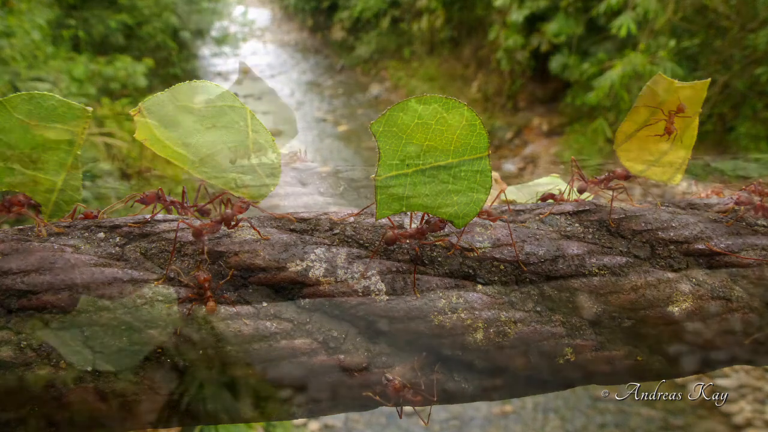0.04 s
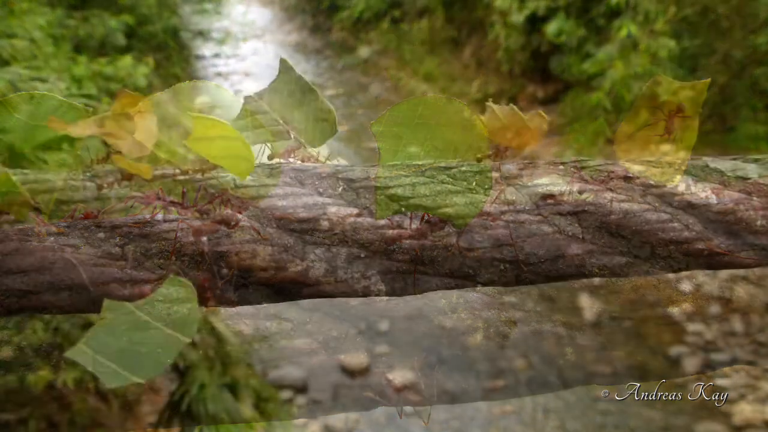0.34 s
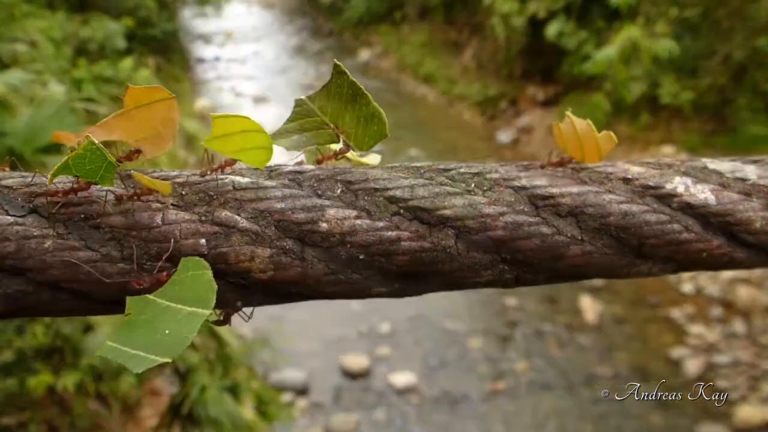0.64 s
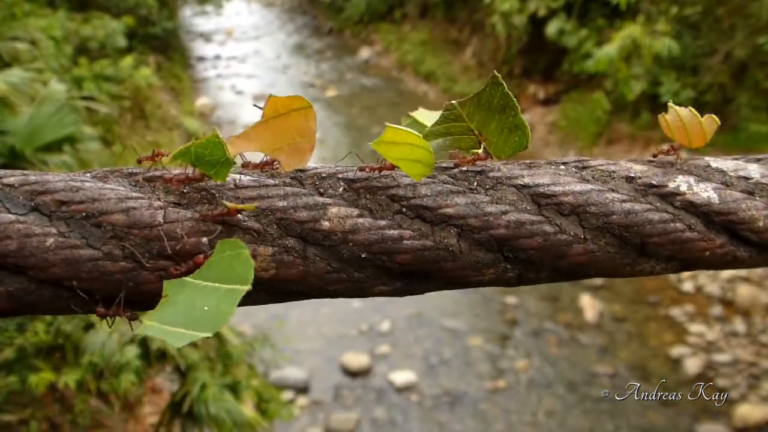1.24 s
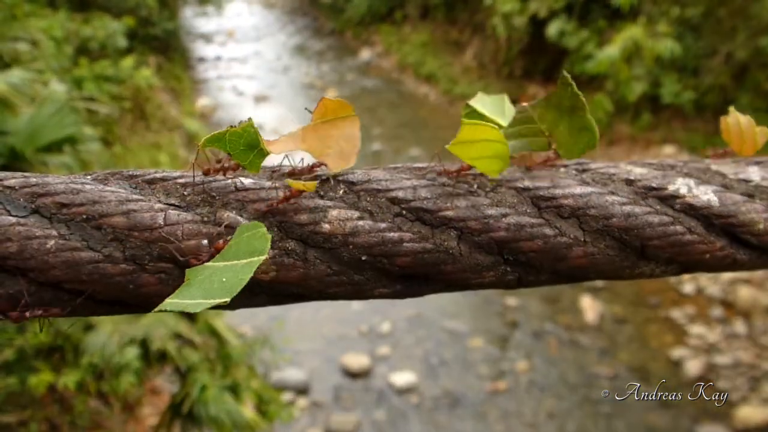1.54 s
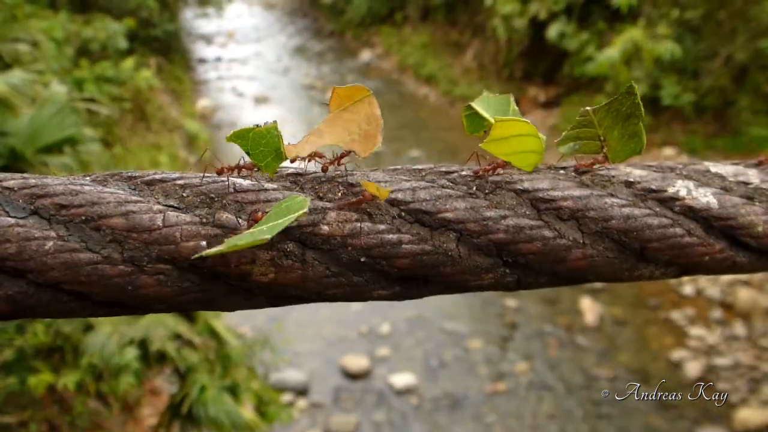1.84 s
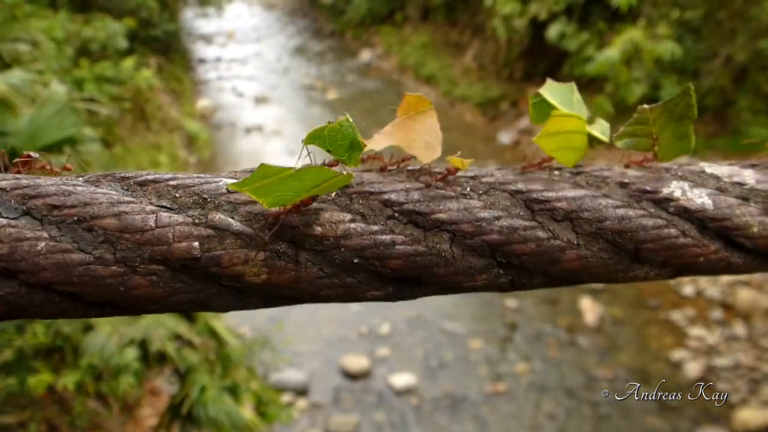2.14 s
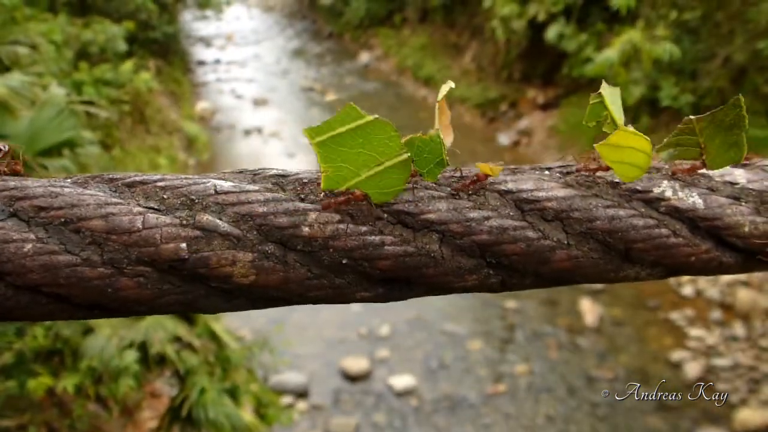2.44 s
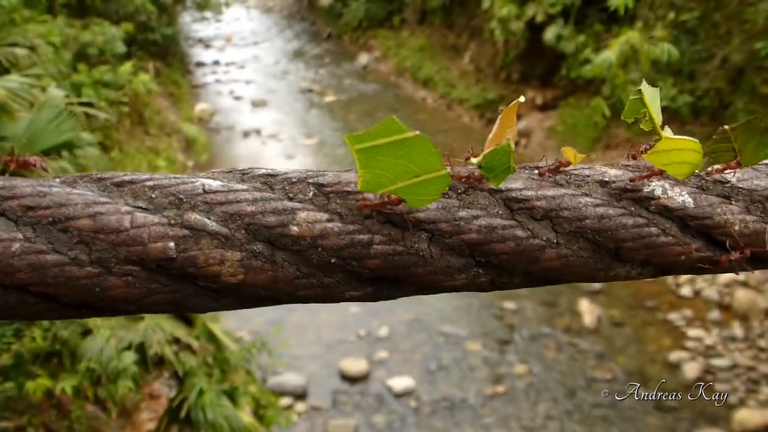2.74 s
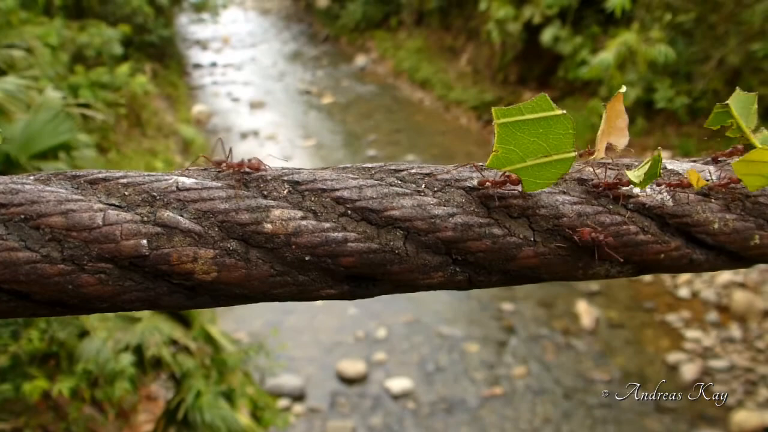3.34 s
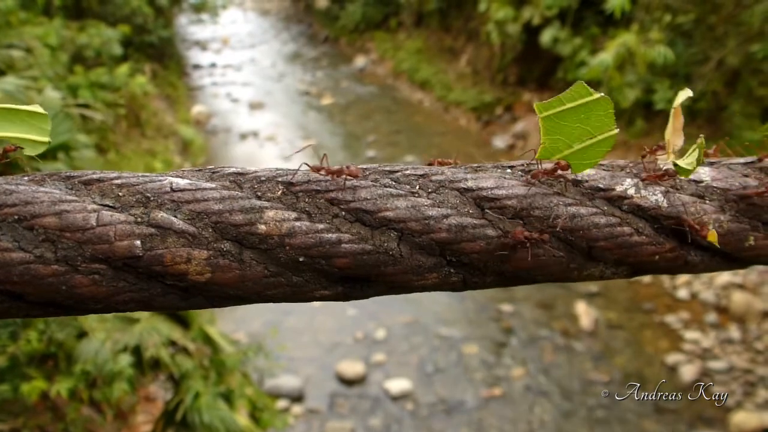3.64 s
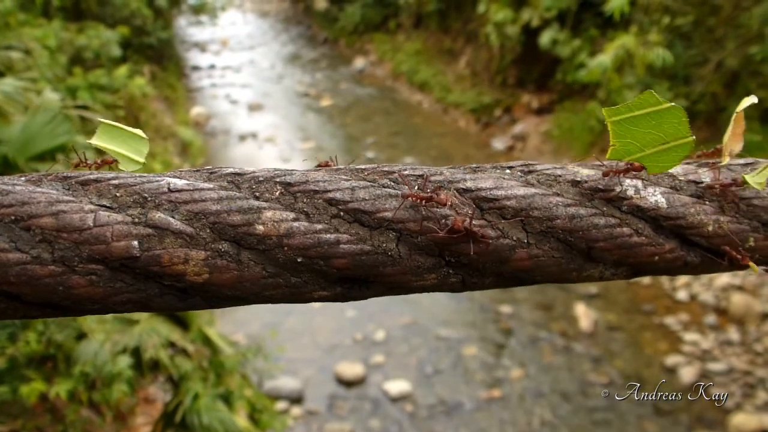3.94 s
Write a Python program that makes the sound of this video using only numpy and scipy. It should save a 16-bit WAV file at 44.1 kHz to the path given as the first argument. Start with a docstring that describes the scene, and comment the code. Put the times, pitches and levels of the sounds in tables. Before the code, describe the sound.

Steady rush of a stream churning over rocks, with small gulps and a faint bird.

```python
"""A forest stream rushes over rocks, in mono.
White water makes a broad, churning rush; countless bubbles ring in it and a few big air pockets gulp.
A small bird chips faintly over the water. Banks and trees scatter the bubbles, gulps and chips.
The sound cuts in after a quarter second and fades up."""
import sys
import numpy as np
from scipy import signal
from scipy.fft import rfft, irfft
from scipy.io import wavfile
from scipy.ndimage import uniform_filter1d

SR = 44100
rng = np.random.default_rng(int(sys.argv[2]) if len(sys.argv) > 2 else 0)


def master_out(mix):
    """Clip the mix to full scale and print it as 16-bit PCM to the path in sys.argv[1]."""
    frames = np.transpose(np.atleast_2d(mix))
    ceiling = np.clip(frames, -1, 1)
    pcm = np.round(ceiling * 32767).astype(np.int16)
    wavfile.write(sys.argv[1], SR, pcm)


N = 176400

# white-water spectral density: f/Hz, relative level/dB
RUSH_SPECTRUM = [(25, -31), (42, -30), (57, -16.5), (78, -21.5), (115, -11), (188, -7), (255, -1.5),
                 (310, -1), (380, 0), (510, 1), (826, -1.5), (1000, -3.5), (1380, -4), (1800, -7.5),
                 (2300, -9), (4150, -15), (5580, -17), (6600, -18.5), (7800, -21.5), (10000, -24),
                 (14300, -31), (15600, -36)]
# slow swell of the rush's midrange: t/s, gain/dB
MID_SWELL = [(.26, -0.1), (.38, 0.5), (.6, 0), (.82, 0.8), (1.0, 0.2), (1.18, -1), (1.5, 0), (1.85, -.9),
             (2.05, 0.1), (2.35, 0.3), (2.6, -1.4), (2.98, 1), (3.42, -0.5), (3.58, 0.5), (3.7, 0.2),
             (4.0, 0.5)]
# bubble-swarm filter: f/Hz, relative gain/dB
BUBBLE_EQ = [(150, -34), (330, -1), (600, -2.5), (1300, 2), (2300, -5.5), (5000, -12.5), (12000, -23)]
# air pockets: t/s, start f/Hz, peak level/dB
AIR_POCKETS = [(.811, 1230, -21), (.964, 544, -21), (1.402, 370, -18.5), (1.532, 309, -24.5),
               (1.614, 342, -20.5), (2.040, 320, -28), (2.912, 380, -23.5), (2.960, 618, -20.5),
               (3.093, 387, -19.5), (3.504, 538, -18.5), (3.533, 675, -12), (3.565, 710, -20.5)]
# bird chips: t/s, length/s, start f/Hz, end f/Hz, peak level/dB
BIRD_CHIPS = [(1.087, .040, 5700, 5100, -31.5), (1.132, .032, 5420, 5620, -32),
              (1.555, .026, 5500, 5760, -34), (2.278, .034, 5700, 5880, -36),
              (2.323, .028, 5900, 5700, -40), (2.442, .026, 6600, 6250, -38),
              (3.217, .032, 5750, 5500, -36), (3.250, .036, 5620, 5800, -38),
              (3.368, .050, 6950, 6650, -39)]


def rush(bands=20, rms_db=-24.5, mid_hz=850, mid_sigma_oct=1.1):
    """White water: half-octave noise bands surge together, churn with neighbours and flicker alone."""
    noise = rfft(rng.standard_normal(N))
    f_hz = np.maximum(np.fft.rfftfreq(N, 1 / SR), 1)
    band = np.minimum((2 * np.log2(SR / 2 / f_hz)).astype(int), bands - 1)
    surge_db = 0.05 * jitter(rate_hz=14)
    splashes = np.array([jitter(rate_hz=45) for _ in range(bands)])
    churn_db = 0.35 * set_rms(uniform_filter1d(splashes, size=5, axis=0), 0)
    swell_db = np.interp(np.arange(N) / SR, *np.array(MID_SWELL).T)
    water = np.zeros(N)
    for k in range(bands):
        offset_oct = np.log2(f_hz[band == k].mean() / mid_hz)
        mid_share = np.exp(-0.5 * (offset_oct / mid_sigma_oct) ** 2)
        flicker_db = 0.59 * jitter(rate_hz=50)
        gain_db = surge_db + mid_share * swell_db + churn_db[k] + flicker_db
        water += irfft(noise * (band == k), N) * undb(gain_db)
    return set_rms(equalise(water, RUSH_SPECTRUM), rms_db)


def bubble(f_hz, cycles, rise, attack):
    """Trapped air rings up, then decays as its pitch rises. Cycles and rise are per decay time."""
    age = np.arange(int(6 * cycles / f_hz * SR)) * f_hz / (cycles * SR)  # in decay times, as is attack
    envelope = (1 - np.exp(-(age / attack) ** 2)) * np.exp(-age)
    phase_rad = 2 * np.pi * cycles * (age + rise * age ** 2 / 2)
    return envelope / envelope.max() * np.sin(phase_rad)


def bubble_swarm(rate_per_s=2400, low_hz=261.8, high_hz=12910, rms_db=-33.5):
    """Bubbles of all sizes ring at random times, most of them faintly."""
    swarm = np.zeros(N)
    for when, smallness, strength, sustain in rng.random((int(rate_per_s * N / SR), 4)):
        f_hz = low_hz * (high_hz / low_hz) ** np.sqrt(smallness)
        gain_db = 4 * min(-np.log(1 - strength), 4)  # capped exponential distribution
        ring = bubble(f_hz, cycles=7.84 * (0.5 + sustain), rise=0.0487, attack=0.19)
        add(swarm, when * N / SR, undb(gain_db) * np.sqrt(f_hz) * ring)
    return set_rms(equalise(swarm, BUBBLE_EQ), rms_db)


def gulps():
    """Big air pockets close behind rocks and ring briefly above the rush."""
    out = np.zeros(N)
    for t_s, f_hz, peak_db in AIR_POCKETS:
        add(out, t_s, undb(peak_db) * bubble(f_hz, cycles=3.8, rise=0.014, attack=0.55))
    return out


def bird(warble_rms_hz=91):
    """A small bird chips: short, thin glides with a quick pitch tremble."""
    out = np.zeros(N)
    for t_s, length_s, start_hz, end_hz, peak_db in BIRD_CHIPS:
        n = int(length_s * SR)
        f_hz = np.linspace(start_hz, end_hz, n) + warble_rms_hz * jitter(rate_hz=266)[:n]
        tone = np.sin(2 * np.pi * np.cumsum(f_hz) / SR)
        add(out, t_s, undb(peak_db) * np.hanning(n) * tone)
    return out


def bank_scatter(direct, tail_db=-11.5, t60_s=0.46):
    """Banks and trees add a short diffuse tail to the direct sound."""
    t_s = np.arange(SR // 2) / SR
    tail = rng.standard_normal(len(t_s)) * undb(-60 * t_s / t60_s)
    tail /= np.linalg.norm(tail)
    return direct + undb(tail_db) * signal.fftconvolve(direct, tail)[:N]


def undb(db):
    """Decibels to gain."""
    return 10 ** (np.asarray(db) / 20)


def set_rms(x, rms_db):
    """Scale to an rms level."""
    return x * undb(rms_db) / np.sqrt(np.mean(x ** 2))


def equalise(x, curve):
    """Filter by (f/Hz, gain/dB) points joined on a log-frequency axis."""
    points_hz, points_db = np.array(curve).T
    f_hz = np.maximum(np.fft.rfftfreq(N, 1 / SR), 1)
    gain_db = np.interp(np.log(f_hz), np.log(points_hz), points_db)
    return irfft(rfft(x) * undb(gain_db), N)


def jitter(rate_hz):
    """Random values joined by ramps; unit rms."""
    hold = int(SR / rate_hz)
    values = rng.standard_normal(1024)
    steps = values[np.arange(N) // hold % len(values)]
    return set_rms(uniform_filter1d(steps, hold), 0)


def add(out, t_s, sound):
    """Mix a sound in at t_s."""
    start = int(t_s * SR)
    out[start:start + len(sound)] += sound[:N - start]


def scene():
    """Water and bird, the same in both channels."""
    mono = rush() + bank_scatter(bubble_swarm() + gulps() + bird())
    return np.array([mono, mono])


def record(dry, start_s=0.2575, start_db=-5.5, fade_s=0.49, cutoff_hz=15700):
    """Cut-in part-way up a linear fade, then a steep low-pass."""
    t_s = np.arange(N) / SR
    fade = (t_s >= start_s) * np.interp(t_s, [start_s, start_s + fade_s], [undb(start_db), 1])
    lowpass = signal.ellip(10, 0.1, 80, cutoff_hz, fs=SR, output="sos")
    return signal.sosfilt(lowpass, dry * fade)


dry = scene()
out = record(dry)
master_out(out)
```